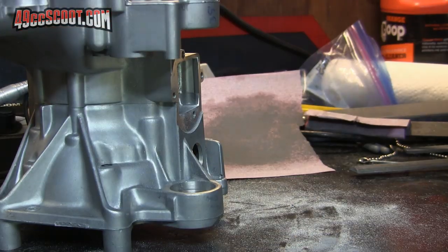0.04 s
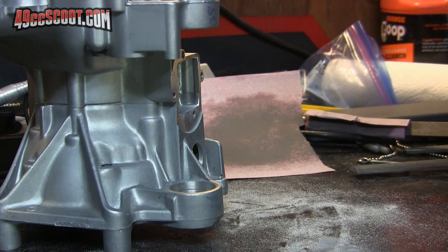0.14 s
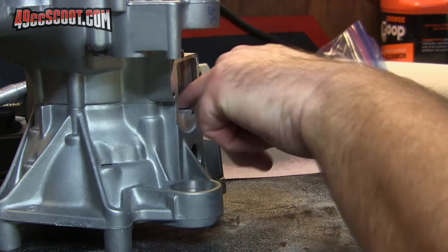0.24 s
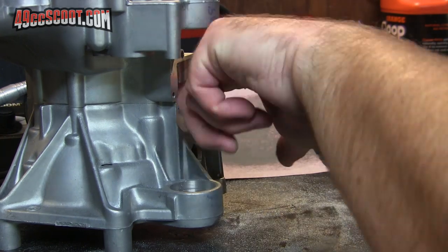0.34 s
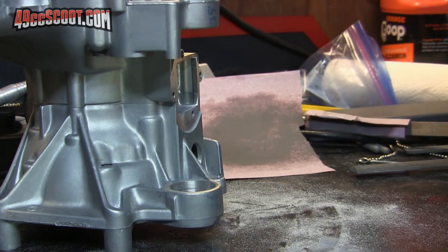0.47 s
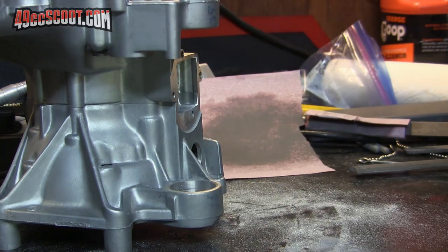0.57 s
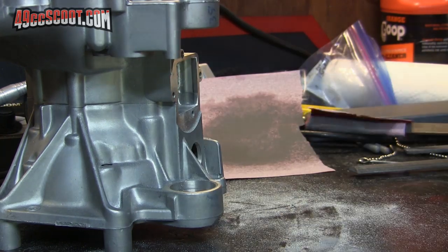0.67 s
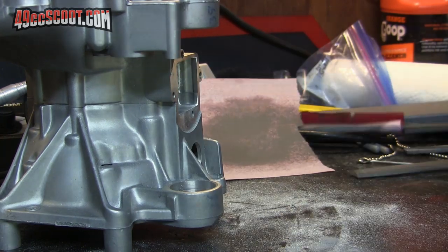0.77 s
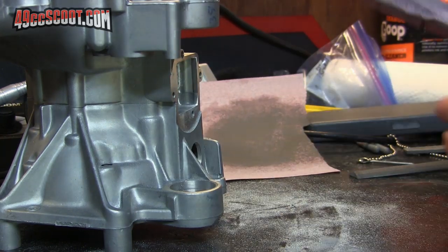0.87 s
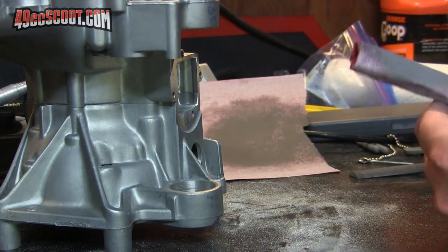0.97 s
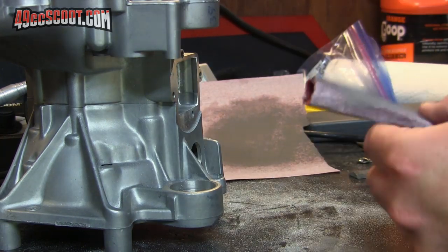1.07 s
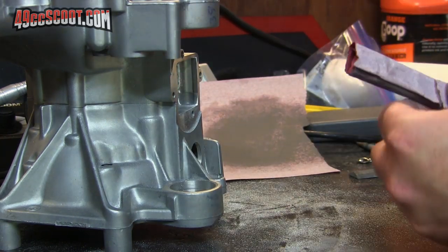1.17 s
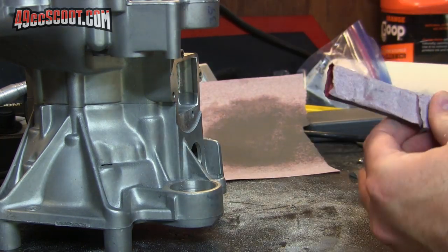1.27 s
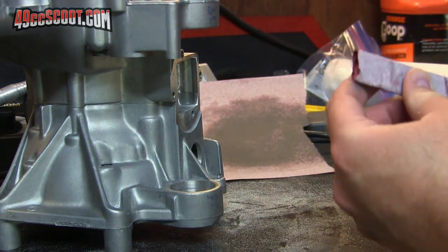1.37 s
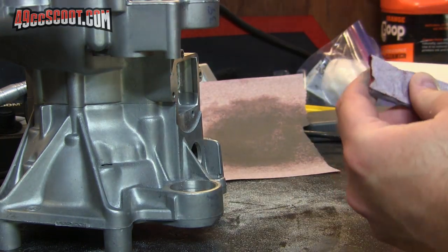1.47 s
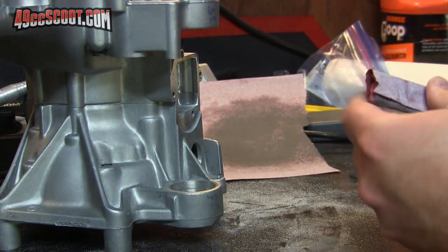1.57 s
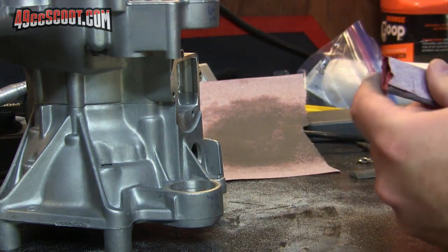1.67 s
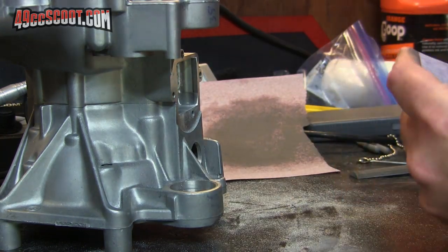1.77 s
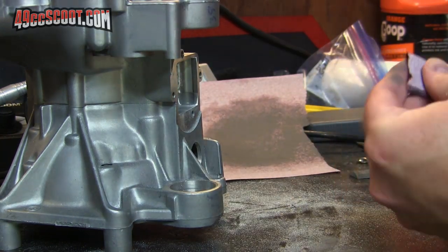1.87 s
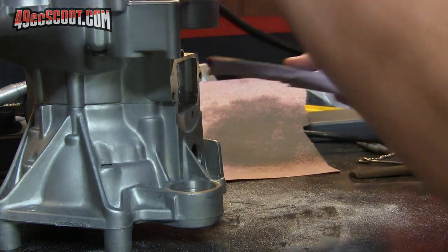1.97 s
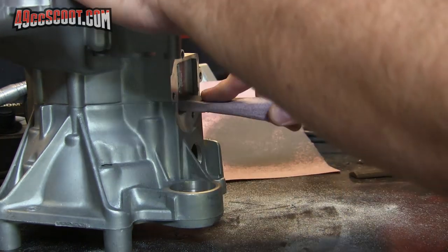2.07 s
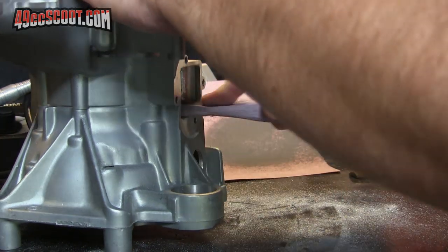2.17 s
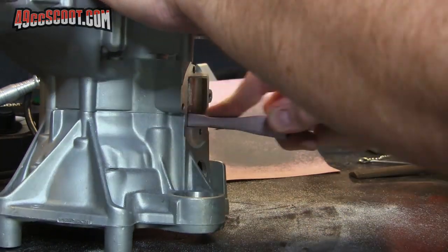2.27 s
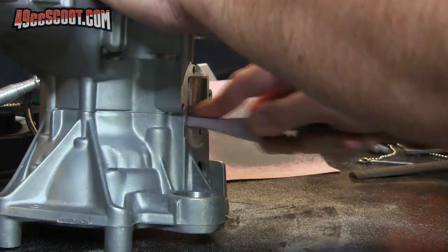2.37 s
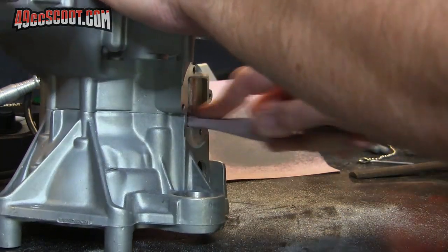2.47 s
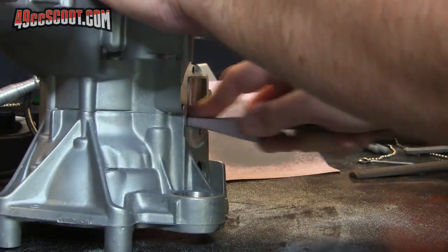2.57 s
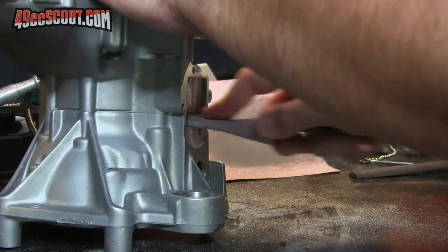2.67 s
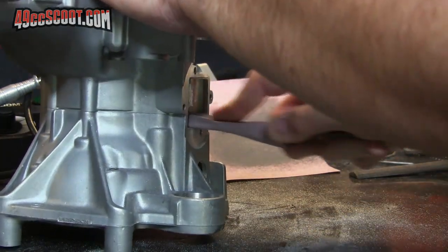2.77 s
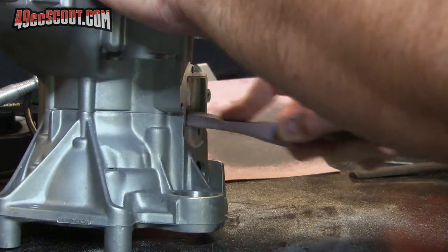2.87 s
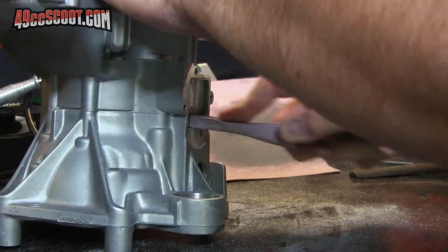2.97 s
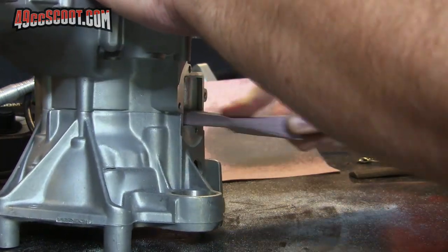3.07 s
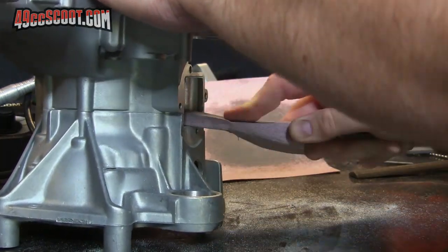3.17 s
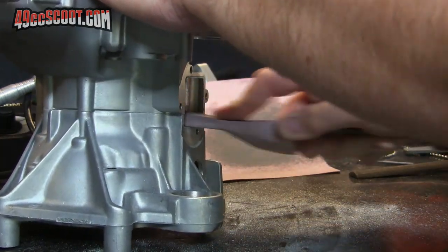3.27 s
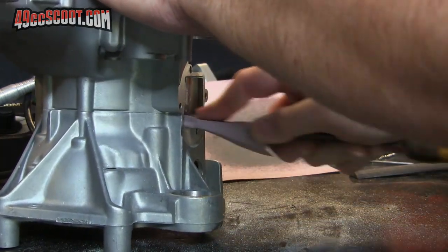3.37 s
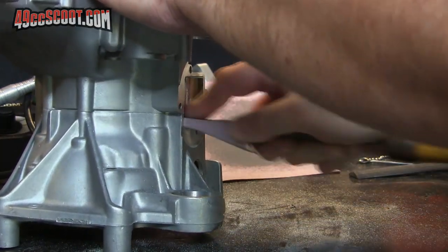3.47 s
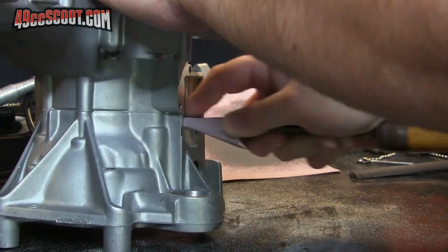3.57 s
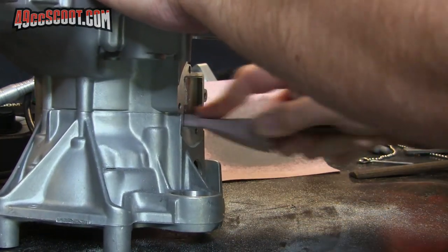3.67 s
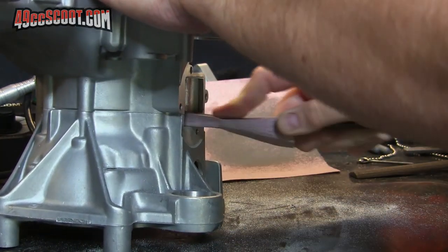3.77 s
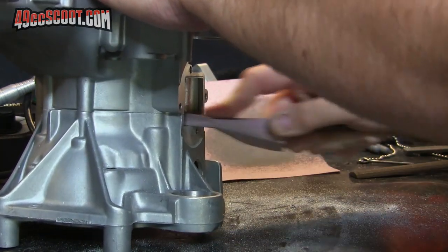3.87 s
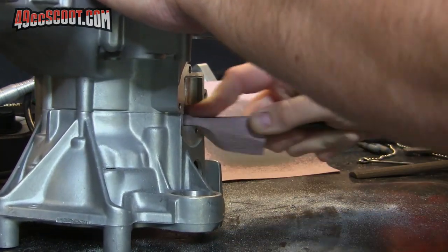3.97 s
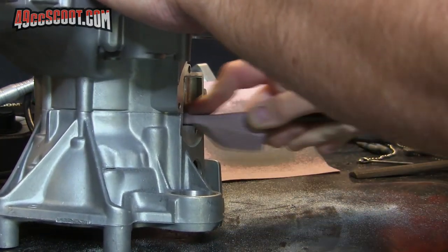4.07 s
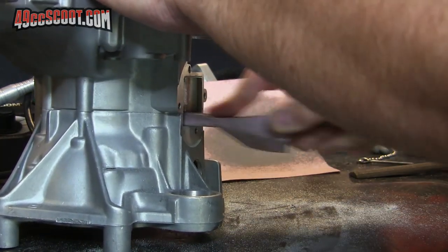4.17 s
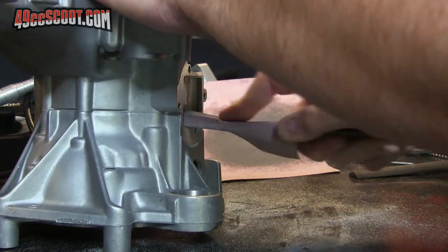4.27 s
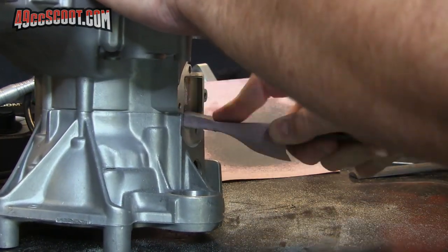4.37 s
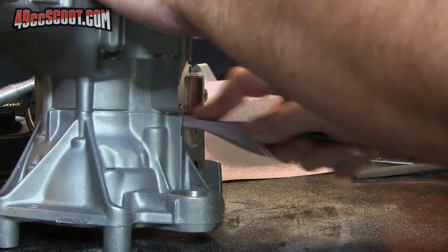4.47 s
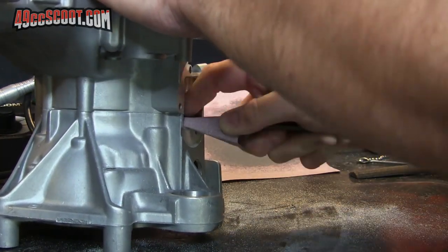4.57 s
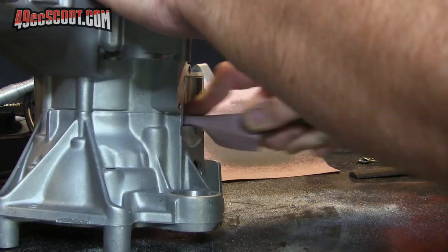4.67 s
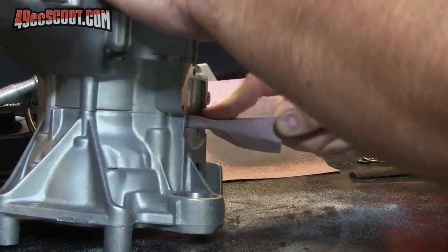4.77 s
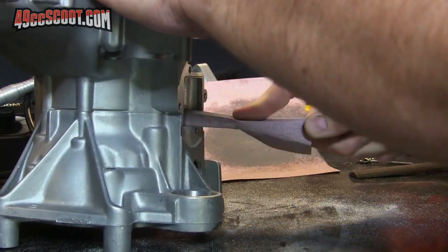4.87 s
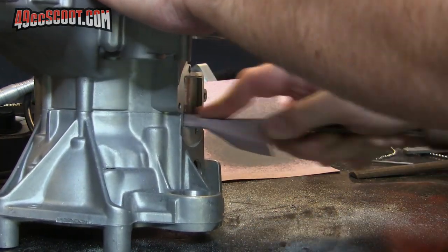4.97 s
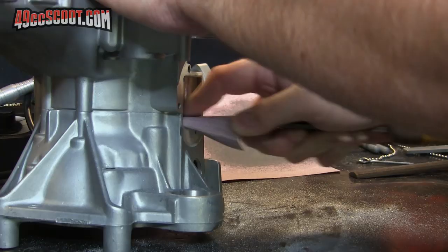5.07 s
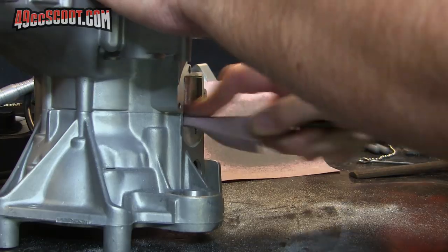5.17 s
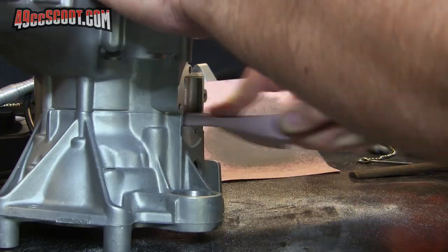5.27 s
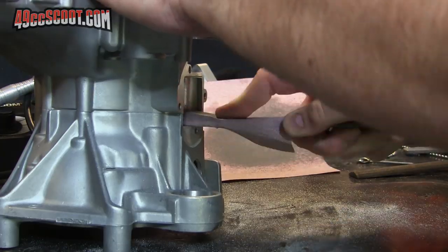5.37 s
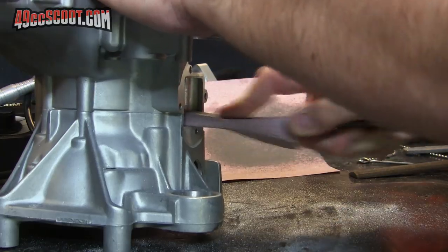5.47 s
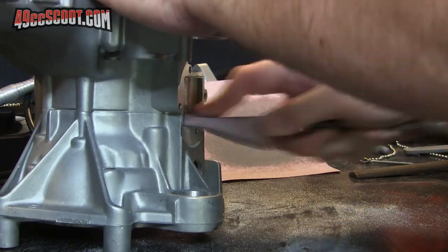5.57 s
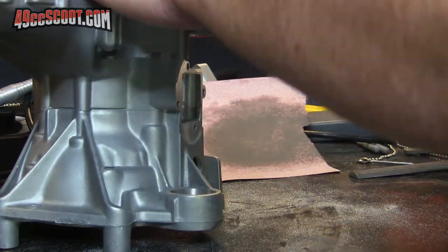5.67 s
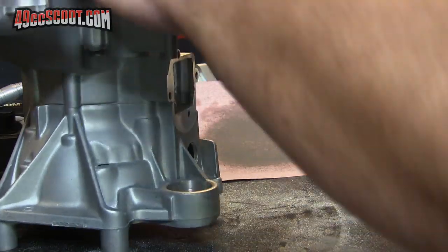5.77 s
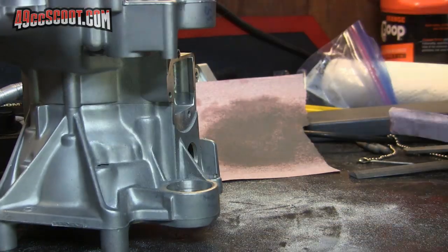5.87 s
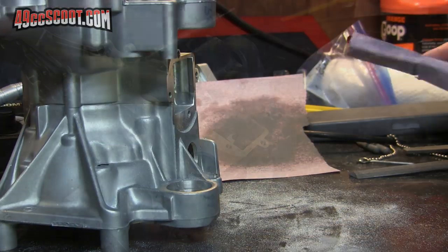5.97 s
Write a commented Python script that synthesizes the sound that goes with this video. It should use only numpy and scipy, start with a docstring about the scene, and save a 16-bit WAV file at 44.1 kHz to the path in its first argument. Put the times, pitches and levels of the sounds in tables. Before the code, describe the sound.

A close stereo microphone in a workshop picks up steady soft hiss, unsteady low rumble and the thin, wavering partials of a machine's hum. From 0 to 2 s there are dull, muffled bumps through the stand, a couple of faint scratches near the start and at 0.8 s, and tiny abrasive crinkles around 1 to 1.4 s. A stronger knock at about 2 s and brighter scrapes at 2.1 s lead into filing from 2.2 s: extremely quick strokes, dozens a second, a bright, dry, gritty flutter on aluminium. Around 2.4 to 3 s a vehicle's sinking whine and brief roar pass outside, peaking near 2.6 s. Sharp snags spit and ring, most regularly from 3.8 to 4.3 s, then more scattered. Filing stops at 5.7 s; brighter hiss and slight bumps remain, and the level drops briefly at 5.95 s.

```python
"""In a workshop, close to a stereo microphone, an abrasive-wrapped file scrubs an aluminium casting.
The very quick strokes are coloured noise; each push meets an edge, and some catch and ring in sharp spits.
Dull bumps of low noise reach the microphone through its stand; a vehicle's whine and roar pass outside.
Behind lie rumble, hiss and the thin partials of a machine's hum; near the end the level dips briefly."""
import sys
import numpy as np
from scipy.fft import rfft, irfft, next_fast_len
from scipy.io import wavfile
from scipy.ndimage import map_coordinates

SR = 44100
rng = np.random.default_rng(int(sys.argv[2]) if len(sys.argv) > 2 else 0)


def to_wav(s):
    """Save 16-bit WAV."""
    ch = np.atleast_2d(s).T  # columns
    pcm = np.round(np.clip(ch, -1, 1) * 32767)  # PCM
    wavfile.write(sys.argv[1], SR, pcm.astype(np.int16))


N = 266364
TIME = np.arange(N) / SR  # s


def amp(db):
    """Decibels to gain."""
    return 10 ** (np.asarray(db) / 20)


def unit(x):
    """Scale to rms 1."""
    return x / np.sqrt(np.mean(x ** 2) + 1e-20)


def along(points, hz):
    """Read (f/Hz, value) points on a log frequency axis."""
    f, v = np.transpose(points)
    return np.interp(np.log(hz + 1), np.log(f + 1), v)


def curves(rows):
    """One value per sample for each column after the time."""
    s, *columns = np.transpose(rows)
    return [np.interp(TIME, s, column) for column in columns]


def wobble(rate):
    """A smooth random curve, rate knots a second."""
    knots = rng.standard_normal(int(N * rate / SR) + 4)
    return map_coordinates(knots, [TIME * rate])


def filtered(x, response):
    """Filter x by a response of frequency, padded so that tails do not wrap round."""
    size = next_fast_len(N + SR // 2)
    spectrum = rfft(x, size) * response(np.fft.rfftfreq(size, 1 / SR))
    return irfft(spectrum, size)[..., :N]


def colour(spectrum):
    """Response of a smooth spectrum."""
    return lambda hz: amp(along(spectrum, hz))


def resonances(modes):
    """Causal response of damped modes, each a band-pass around its own frequency."""
    def mode(f, centre, width, db):
        return amp(db) * 1j * f * width / (centre * centre - f * f + 1j * f * width)
    return lambda f: sum(mode(f, *row) for row in modes)


def rush(response, alike, grain=1):
    """Stereo noise of rms 1 with a given left-right coherence; grain clumps it before it is coloured."""
    def mid_side(hz):
        turn = np.arccos(np.clip(along(alike, hz), -1, 1)) / 2
        return response(hz) * np.array([np.cos(turn), np.sin(turn)])
    mid, side = filtered(grain * rng.standard_normal((2, N)), mid_side)
    return unit(np.array([mid + side, mid - side]))


def swells(times, levels_db, widths, skirt_db):
    """Envelope of bell-shaped bursts, each on a wider, weaker skirt."""
    power = np.zeros(N)
    for s, db, width in zip(times, levels_db, widths):
        centre = int(s * SR)
        near = slice(max(centre - SR // 10, 0), centre + SR // 10)
        u = np.abs(TIME[near] - s) / max(width, 1 / SR)
        bell = np.exp(-u ** 2 / 2)
        skirt = amp(skirt_db) ** 2 * np.exp(-u / 2)
        power[near] += amp(db) ** 2 * (bell + skirt)
    return np.sqrt(power)


# Pace of the hand, pushes and pulls counted alike: t/s, strokes per s
PACE = [(2.176, 17.9), (2.3, 35.47), (2.55, 39.17), (2.8, 42.59), (3.0, 42.03), (3.2, 37.42), (3.45, 39.11),
        (3.65, 35.64), (4.0, 34.47), (4.3, 37.84), (4.55, 36.03), (4.8, 36.22), (5.1, 35.62), (5.4, 36.54),
        (5.69, 37.21)]


def travel():
    """Strokes made so far, per sample: the pace summed over time, still outside the filing."""
    s, per_s = np.transpose(PACE)
    return np.cumsum(np.interp(TIME, s, per_s, left=0, right=0)) / SR


# How hard the file is pressed, before scatter and stroke shape: t/s, level/dB
PRESSURE = [(2.18, -40.5), (2.27, -35.5), (2.5, -37), (2.7, -34), (2.77, -39), (2.95, -36.5), (3.15, -39.5),
            (3.55, -38.5), (3.85, -34.5), (4.03, -35), (4.15, -41.5), (4.4, -38.5), (4.75, -38.5),
            (4.88, -40.5), (5.08, -37.5), (5.67, -36.5)]
# Grit on metal, close to the microphone: f/Hz, density/dB per Hz
RASP = [(500, -39), (2000, -26), (3800, -5), (5200, -5), (7000, 0), (8800, 2), (10500, 5), (13500, 3),
        (15500, -1)]
# Resonances of the casting and the file: f/Hz, width/Hz, level/dB
METAL = [(4700, 85, -6), (4895, 170, 3), (5210, 174, 0), (5500, 190, 1), (5340, 97, -5), (9460, 240, -3),
         (9730, 110, -7), (10050, 120, 5), (10440, 170, -0.5), (11950, 200, -10), (11900, 170, 3.5),
         (12350, 250, -18), (13200, 200, -15), (13950, 180, -19), (15600, 150, -5), (15300, 240, 0)]
# Left-right likeness of the file at the microphone: f/Hz, coherence
FILE_ALIKE = [(2000, 0.985), (8000, 0.995)]
# Scatter from stroke to stroke; gain of a push, equally the loss of a pull
UNEVEN_DB, PUSH_DB = 1.75, 0.47


def strokes(turn_db, sharpness, grit_db, chatter_db, rasp_db, metal_db):
    """Grit tears at the metal, loudest in mid-stroke and nearly still at each turn."""
    done = travel()
    speed = np.abs(np.sin(np.pi * done))
    level_db, = curves(PRESSURE)
    index = np.arange(int(done[-1]) + 1)
    push_pull_db = PUSH_DB * (-1) ** index
    own_db = UNEVEN_DB * rng.standard_normal(len(index)) + push_pull_db
    pressure = amp(level_db + own_db[done.astype(int)] + chatter_db * wobble(240))
    contact = (done > 0) & (done < done[-1])
    grit = amp(grit_db * wobble(3000))
    rasp = amp(rasp_db) * rush(colour(RASP), FILE_ALIKE, grit)
    metal = amp(metal_db) * rush(resonances(METAL), FILE_ALIKE, grit)
    return contact * pressure * (amp(turn_db) + speed ** sharpness) * (rasp + metal)


# Grit snags hard or brushes on an edge, before the snag and ring gains:
# t/s, level/dB, half-length/s, casting's ring over the snag/dB
CATCHES = [(0.0305, -32, 0.0011, -3), (0.053, -35, 0.008, -13), (0.8044, -40.5, 0.0018, -1),
           (0.858, -40, 0.0045, -6), (0.8777, -35, 0.0022, -13), (1.779, -37.5, 0.0022, -11),
           (2.1175, -31, 0.003, -5), (2.1275, -26, 0.0043, -4.5), (2.599, -29, 0.0037, -12),
           (3.1058, -33.5, 0.0014, 6.5), (3.1236, -34.5, 0.0011, 6.5), (3.179, -26.5, 0.0019, -0.5),
           (3.234, -28, 0.0025, -9), (3.341, -24.5, 0.00051, 1.5), (3.392, -29, 0.0007, -18),
           (3.769, -36, 0.003, -9), (3.828, -22, 0.00095, -21), (3.885, -20, 0.00082, -6),
           (3.9448, -20, 0.00047, 1), (4.002, -22, 0.00084, -3.5), (4.0583, -26.5, 0.0014, 1),
           (4.1145, -20, 0.0013, -6), (4.172, -19.5, 0.00084, -4), (4.2256, -25.5, 0.0011, -1.5),
           (4.283, -29, 0.0024, -5.5), (4.334, -29, 0.001, -19), (4.4936, -29, 0.0016, -23),
           (4.7154, -25, 0.0012, -10.5), (4.7705, -24.5, 0.0016, -2.5), (4.8264, -33.5, 0.003, 1.5),
           (4.9365, -30.5, 0.0015, -6), (5.2735, -31, 0.0016, -21), (5.3823, -22.5, 0.0014, -3.5),
           (5.6834, -22.5, 0.0011, -27)]
# A spit of grit: f/Hz, density/dB per Hz
SNAG = [(600, -43), (2000, -15), (4000, -9.5), (7000, -2), (10500, 5.5), (13000, 1), (15500, 3)]
# What a snag rings in the casting: f/Hz, width/Hz, level/dB
RING = [(4340, 1600, -15), (4750, 610, 8.5), (5043, 83, 13.5)]


def catches(snag_db, ring_db, metal_db, grit_db):
    """A snag is a short, dense spit of grit that rings the casting."""
    events = np.vstack([CATCHES, edge_ticks(share_db=-17), crinkles(count=12)])
    s, db, width, share_db = events.T
    grit = amp(grit_db * wobble(3000))
    metal = amp(metal_db) * rush(resonances(METAL), FILE_ALIKE, grit)
    tear = rush(colour(SNAG), FILE_ALIKE, grit) + metal
    spit = swells(s, db + snag_db, width, skirt_db=-13) * tear
    ring_swell = swells(s, db + share_db + ring_db, width, skirt_db=-5.5)
    return spit + ring_swell * rush(resonances(RING), FILE_ALIKE)


# The edge: share of the stroke done by then, level over the pressure, its scatter, half-length.
# The level is before the snag gain.
EDGE_AT, EDGE_DB, EDGE_SCATTER_DB, EDGE_S = 0.716, 1, 2.5, 0.0018


def edge_ticks(share_db):
    """The edge snags lightly in each push without a listed catch; rows like those of CATCHES."""
    done = travel()
    level_db, = curves(PRESSURE)
    pushes = np.arange(0, int(done[-1]), 2)
    at = np.searchsorted(done, pushes + EDGE_AT)
    db = level_db[at] + EDGE_DB + EDGE_SCATTER_DB * rng.standard_normal(len(at))
    caught = np.interp(np.transpose(CATCHES)[0], TIME, done).astype(int)
    light = ~np.isin(done[at].astype(int), caught)
    return [(s, level, EDGE_S, share_db) for s, level in zip(TIME[at][light], db[light])]


# The abrasive crinkles as the file is picked up; level before the snag gain
CRINKLE_FROM_S, CRINKLE_TO_S = 0.95, 1.42
CRINKLE_DB, CRINKLE_SCATTER_DB, CRINKLE_S = -42.5, 2, 0.00091  # level, scatter, half-length


def crinkles(count):
    """Faint ticks of the abrasive in the hand at random moments; rows like those of CATCHES."""
    times = CRINKLE_FROM_S + (CRINKLE_TO_S - CRINKLE_FROM_S) * rng.random(count)
    db = CRINKLE_DB + CRINKLE_SCATTER_DB * rng.standard_normal(count)
    return [(s, level, CRINKLE_S, -9) for s, level in zip(times, db)]


# The stronger bumps that reach the microphone through its stand, before the bump gain:
# t/s, level/dB, half-length/s, left minus right/dB
BUMPS = [(0.051, -28, 0.0036, 0.5), (0.092, -37, 0.007, 0), (0.38, -30.5, 0.011, 2),
         (0.444, -36.5, 0.0034, 4), (0.487, -31.5, 0.012, 2.5), (0.583, -36.5, 0.0022, 0.5),
         (0.923, -44, 0.0054, -2), (1.026, -40, 0.0022, -4), (1.051, -40, 0.0016, -2),
         (1.131, -30.5, 0.0015, -2), (1.189, -41.5, 0.003, 0), (1.346, -32.5, 0.0045, -0.5),
         (1.428, -34, 0.0055, 1), (1.535, -28.5, 0.0024, 3), (1.901, -30, 0.0018, 2),
         (1.933, -30, 0.0066, -0.5), (1.967, -22, 0.0045, 5.5), (2.206, -45, 0.0046, 4),
         (2.303, -40, 0.0053, 1), (2.349, -37, 0.0024, -1), (2.633, -24.5, 0.006, -4),
         (2.677, -35, 0.0022, -5), (2.724, -31, 0.0066, 1), (2.747, -29, 0.0023, 0),
         (2.947, -35.5, 0.0052, 0), (3.069, -37, 0.0052, -2), (3.102, -33.5, 0.0035, 2),
         (3.124, -32.5, 0.0024, -2), (3.186, -27.5, 0.0039, 2), (3.21, -25, 0.0028, 2),
         (3.272, -29, 0.007, 0), (3.36, -42, 0.0072, -1), (3.454, -35.5, 0.0014, 1),
         (3.597, -44, 0.0037, 0), (3.643, -43.5, 0.0024, 0), (3.737, -45, 0.0038, -1),
         (3.873, -33, 0.0013, 0), (3.922, -29, 0.0027, 1), (3.978, -34, 0.0092, 3),
         (4.051, -33.5, 0.0042, 2.5), (4.217, -36, 0.0079, 1.5), (4.416, -40, 0.0015, 4),
         (4.453, -35.5, 0.0071, -2), (4.477, -35, 0.003, 0), (4.577, -39.5, 0.007, 0.5),
         (4.63, -40.5, 0.0055, 0.5), (4.706, -37, 0.0063, 2.5), (4.782, -39, 0.0067, 2),
         (4.885, -34, 0.0062, 1), (4.952, -33.5, 0.0097, 1), (5.081, -44.5, 0.011, 1.5),
         (5.291, -40, 0.0024, -1), (5.328, -40.5, 0.0031, 0.5), (5.459, -44, 0.0035, 0),
         (5.53, -39.5, 0.007, 2.5), (5.578, -33, 0.0033, 2), (5.623, -36, 0.0081, 1),
         (5.654, -36, 0.0053, -0.5), (5.829, -43, 0.0061, -0.5), (5.876, -34.5, 0.003, 1)]
# Direction in which the stand is shaken: t/s, sideways share 0-1
SIDEWAYS = [(0, 0), (.9, 0.02), (1.15, 0.79), (1.95, 0.85), (2.27, 0.44), (2.62, 0.95), (2.74, 0.65),
            (3.21, 0.62), (3.26, 0), (6, 0)]
# A hard, straight bump: f/Hz, density/dB per Hz
THUD = [(25, -30), (100, -37), (180, -34), (300, -13.5), (450, -4), (750, 4.5), (1100, 0.5), (1600, -9.5),
        (2500, -13.5), (4000, -20), (8000, -55)]
# A soft, straight bump: f/Hz, density/dB per Hz
NUDGE = [(25, -30), (110, -28), (200, -18), (330, -4), (500, 2), (720, 1), (1100, -7.5), (1800, -9.5),
         (4000, -25.5)]
# A sideways bump: f/Hz, density/dB per Hz
SWAY = [(25, -29), (100, -26), (180, -26), (300, -14), (450, -2.5), (750, 6), (1100, 1.5), (1600, -7.5),
        (2500, -13.5), (4000, -29), (8000, -55)]


def bumps(bump_db, rough_db, judder_db, crackle_db, hard_db):
    """A straight jolt moves both capsules alike, a sideways one opposes them; hard, straight ones crackle."""
    s, db, width, pan_db = np.vstack([BUMPS, small_jolts(count=70)]).T
    sideways = np.clip(np.interp(s, *np.transpose(SIDEWAYS)), .01, .99)

    def force(share):
        share_db = 10 * np.log10(share)
        return np.array([swells(s, db + bump_db + side * pan_db / 2 + share_db, width, skirt_db=-11)
                         for side in (1, -1)])

    def shake(spectrum):
        return rush(colour(spectrum), [(100, 1)], amp(rough_db * wobble(700)))

    judder = unit(amp(judder_db * wobble(190)))
    straight = judder * force(1 - sideways)
    across = judder * force(sideways)
    hard = straight / (straight + across + amp(hard_db))  # share 0-1
    thud = straight * (np.sqrt(1 - hard) * shake(NUDGE) + np.sqrt(hard) * shake(THUD))
    sway = across * shake(SWAY) * [[1], [-1]]
    crackle_colour = colour([(500, -37), (1300, 0), (3000, -8.5), (6000, -33)])
    crackle = rush(crackle_colour, [(1500, -0.72)], amp(4.3 * wobble(900)))  # largely opposed
    return thud + sway + amp(crackle_db) * straight * hard ** 2 * crackle


# Small jolts in between: mean level over the RUMBLE_LEVEL curve before the bump gain, scatter, half-length
JOLT_DB, JOLT_SCATTER_DB, JOLT_S = 10, 2.5, 0.0039


def small_jolts(count):
    """Weak bumps at random moments, stronger when the rumble is; rows like those of BUMPS."""
    times = (np.arange(count) + rng.random(count)) * TIME[-1] / count
    strength, lean = rng.standard_normal((count, 2)).T
    db = np.interp(times, *np.transpose(RUMBLE_LEVEL)) + JOLT_DB + JOLT_SCATTER_DB * strength
    return [(s, level, JOLT_S, pan_db) for s, level, pan_db in zip(times, db, 2 * lean)]


# Vehicle passing outside, before wavering and fades: t/s, whine f/Hz, whine level/dB, roar level/dB
VEHICLE = [(2.2, 1120, -74, -80), (2.45, 1085, -55, -52), (2.56, 1060, -53.5, -40.5),
           (2.63, 1054, -47.5, -33), (2.72, 1025, -49.5, -43), (2.82, 1016, -48.5, -64),
           (3.05, 987, -61, -65)]
# Partials of the whine: multiple of its f, level/dB
WHINE = [(1, -0.5), (1.38, -1), (1.58, 2), (1.66, -3)]
# The roar: f/Hz, density/dB per Hz
ROAR = [(200, -32), (600, -15), (1200, -7), (1680, -5), (2100, -6.5), (3000, -2), (4200, -11.5),
        (7000, -7.5), (12000, -18)]
# Left-right likeness of roar and hiss at the microphone: f/Hz, coherence
AIR_ALIKE = [(300, 1), (2000, 0.96), (8000, 0.87)]


def vehicle(waver):
    """A whine sinks in pitch as the roar swells and goes by; its upper partials come out with the roar."""
    whine_hz, whine_db, roar_db = curves(VEHICLE)
    closeness = amp((roar_db - roar_db.max()) / 2)
    whine = 0
    for i, (multiple, db) in enumerate(WHINE):
        hz = multiple * whine_hz * (1 + waver * wobble(60))
        partial = np.sqrt(2) * np.sin(2 * np.pi * np.cumsum(hz) / SR)
        strength = amp(db + 2.8 * wobble(30.03))
        whine = whine + strength * partial * (closeness if i else 1)
    fade_in = np.clip((TIME - 2) / 0.29, 0, 1)
    fade_out = np.clip((3.3 - TIME) / 0.27, 0, 1)
    roar = amp(roar_db) * rush(colour(ROAR), AIR_ALIKE)
    return fade_in * fade_out * (amp(whine_db) * whine + roar)


# Low rumble of the workshop and the shaken bench, before its gain and flutter: t/s, level/dB
RUMBLE_LEVEL = [(0, -62), (.3, -69.5), (.53, -50.5), (.74, -70), (1.02, -55.5), (1.75, -57.5), (2.1, -58),
                (2.35, -52.5), (3.28, -51.5), (3.46, -70.5), (3.72, -57.5), (4.5, -59.5), (4.92, -55.5),
                (5.18, -72.5), (5.48, -54.5), (5.74, -60.5), (5.95, -48.5)]
# The rumble: f/Hz, density/dB per Hz
RUMBLE = [(25, -21), (110, -24), (200, -11), (330, -1.5), (500, -0.5), (720, -0.5), (1100, -1), (1800, -11),
          (4000, -16)]
# Workshop hiss, before its gain: t/s, level/dB
HISS_LEVEL = [(0, -41.5), (.75, -43), (1.35, -41.5), (1.7, -42.5), (2.35, -42), (3.15, -43), (3.45, -48.5),
              (3.75, -44.5), (4.6, -46.5), (5.17, -46), (5.5, -43), (6.02, -43)]
# The hiss: f/Hz, density/dB per Hz
HISS = [(100, -57), (600, -7), (1500, -4), (2400, -0.5), (2950, 4.5), (3700, 2.5), (4600, 1), (6300, 4),
        (9000, 0), (12000, -4), (15500, -7.5)]
# Added treble in the hiss: t/s, level/dB
FIZZ_LEVEL = [(0, -58), (1.65, -57), (2, -47), (2.9, -59), (5.45, -61), (5.72, -45), (5.94, -47),
              (6.02, -62)]


def workshop(rumble_db, hiss_db):
    """A fluttering noise rumble under a smooth noise hiss that turns brighter at times."""
    low_db, high_db, fizz_level_db = curves(RUMBLE_LEVEL) + curves(HISS_LEVEL) + curves(FIZZ_LEVEL)
    flutter = amp(3.5 * wobble(60))
    rumble = amp(low_db + rumble_db) * flutter * rush(colour(RUMBLE), [(300, 1.0)])
    hiss = amp(high_db + hiss_db) * rush(colour(HISS), AIR_ALIKE)
    fizz_colour = colour([(1500, -25), (5000, -5), (15000, -4)])
    fizz = amp(fizz_level_db) * rush(fizz_colour, AIR_ALIKE)
    return rumble + hiss + fizz


# Machine hum: t/s, level/dB
HUM_LEVEL = [(0, -50.5), (.7, -54), (1.3, -49.5), (2.1, -53), (3.2, -55.5), (4, -55), (5.1, -58.5),
             (6, -52.5)]
# Hum partials: multiple of the fundamental, relative level/dB before wavering
HUM = [(3, 0), (4, 1), (5, -1), (6, 0), (8, 0.5), (9, 1.5), (10, -7), (11, 4.5), (12, -1), (13, 2.5),
       (14, -12), (16, -2.5)]
HUM_HZ = 257.65  # mean fundamental, itself not among the partials


def hum(waver_db):
    """A machine's harmonics share one slightly drifting pitch, each wavering in strength."""
    level_db, = curves(HUM_LEVEL)
    hz = HUM_HZ * (1 + 0.00057 * wobble(12))
    phase = 2 * np.pi * np.cumsum(hz) / SR
    tone = 0
    for multiple, db in HUM:
        strength = amp(db + waver_db * wobble(10))
        tone = tone + strength * np.sin(multiple * phase + rng.uniform(0, 2 * np.pi))
    return amp(level_db) * unit(tone)


def scene():
    """The filing in the middle, bumps, passing vehicle and workshop around it."""
    rasp = strokes(turn_db=-20.5, sharpness=0.59, grit_db=2.5, chatter_db=1.5, rasp_db=-1.5, metal_db=-5.5)
    snags = catches(snag_db=1.0, ring_db=-4.0, metal_db=-14.5, grit_db=2.0)
    jolts = bumps(bump_db=0.35, rough_db=2.5, judder_db=2.5, crackle_db=-1.5, hard_db=-53.5)
    background = workshop(rumble_db=-0.45, hiss_db=-0.5) + hum(waver_db=3.5)
    return rasp + snags + jolts + vehicle(waver=0.011) + background


TOP_HZ = 15780  # band limit


def record(dry):
    """The level dips briefly by 24 dB, and nothing passes above the band limit."""
    dip = (TIME > 5.951) & (TIME < 6.009)
    return filtered(dry * amp(-24 * dip), lambda hz: hz < TOP_HZ)


dry = scene()
out = record(dry)
to_wav(out)
```